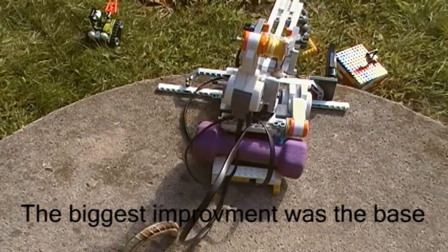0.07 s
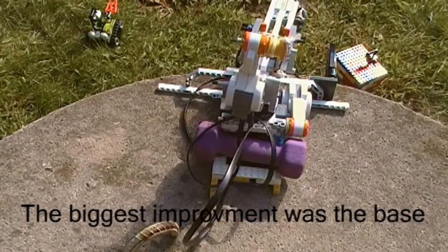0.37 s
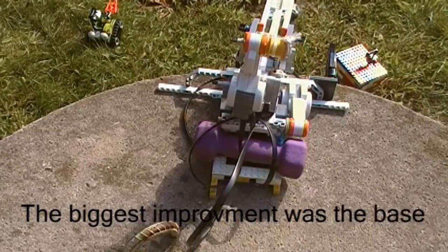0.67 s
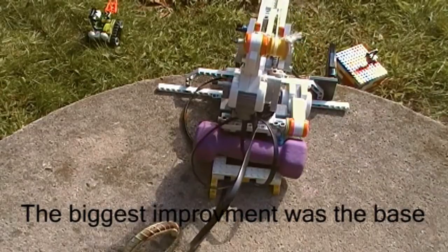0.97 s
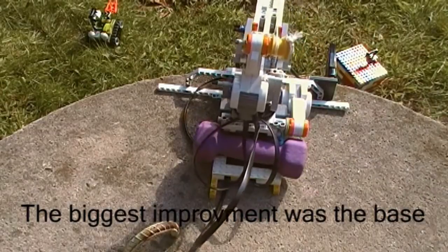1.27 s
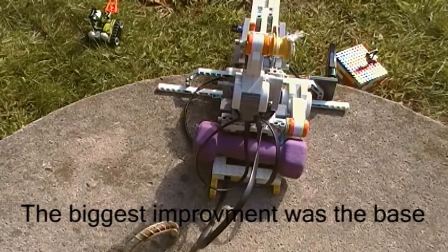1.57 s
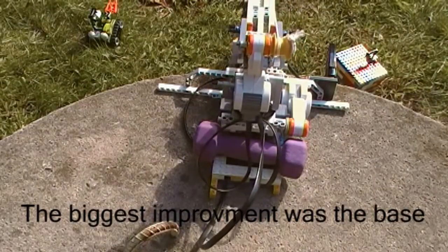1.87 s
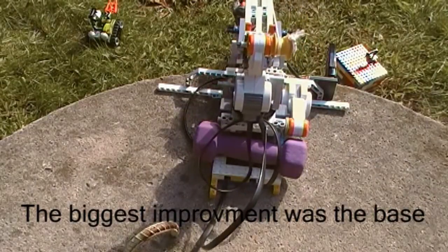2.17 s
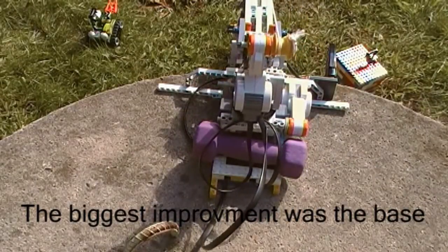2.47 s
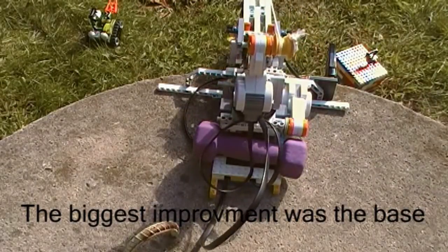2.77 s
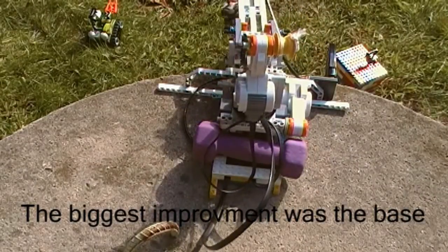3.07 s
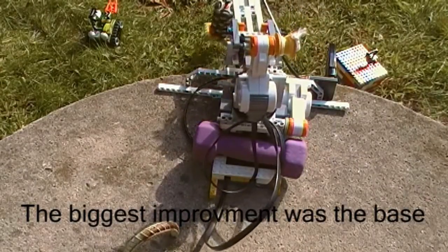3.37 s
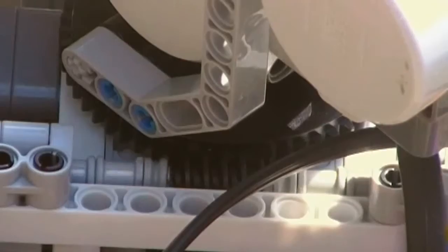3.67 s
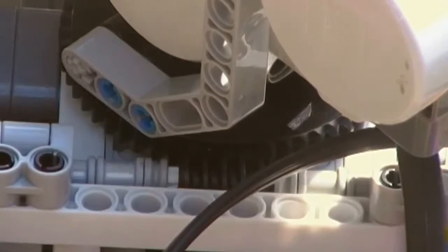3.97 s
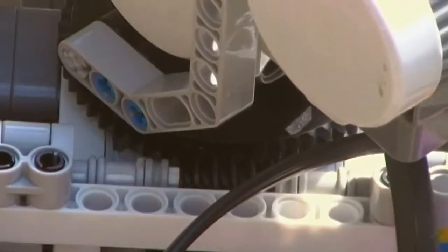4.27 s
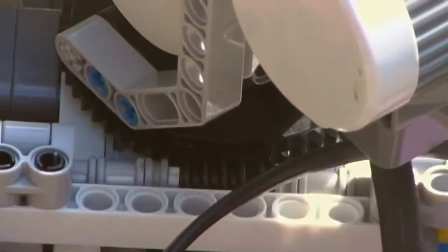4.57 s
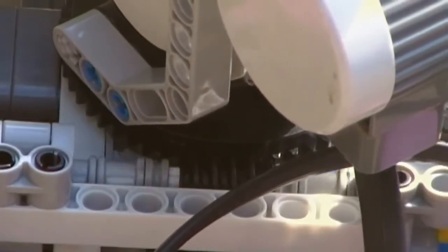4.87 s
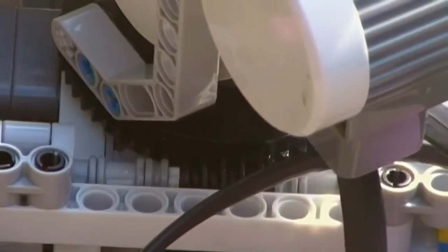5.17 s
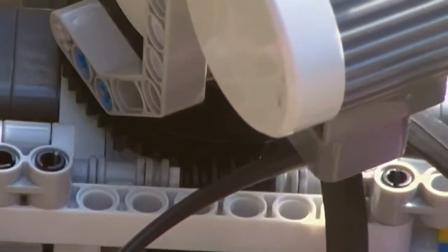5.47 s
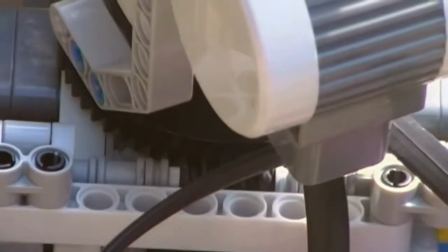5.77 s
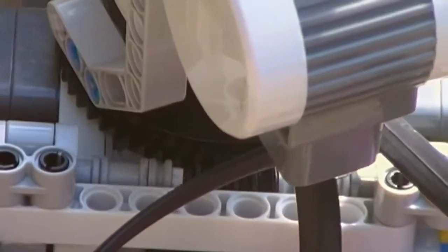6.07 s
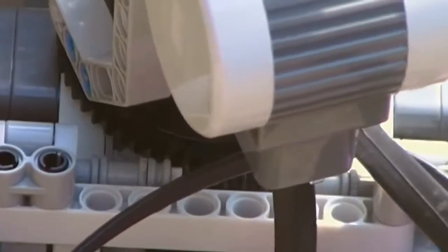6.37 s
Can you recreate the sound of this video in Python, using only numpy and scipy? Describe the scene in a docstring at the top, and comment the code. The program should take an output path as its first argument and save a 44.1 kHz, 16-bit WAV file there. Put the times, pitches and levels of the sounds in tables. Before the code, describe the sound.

A small geared motor whines and throbs outdoors, stops, then a closer, faster, raspier one chatters on over a light breeze.

```python
"""A small geared servo whines and throbs: the hoist of a plastic model crane on a garden slab.
It sags under load and stops; the slewing drive then starts, closer, faster and raspier, and
squeals as the turntable binds. Off-centre gears make the mesh tones throb; pinion teeth strike
the gear trains and ring the plastic housings. Joints creak as the jib rises.
Behind it, a light breeze buffets the microphone over a low rumble and distant hums."""
import sys
import numpy as np
from scipy.fft import rfft, irfft, next_fast_len
from scipy.io import wavfile
from scipy.ndimage import map_coordinates

SR = 44100
rng = np.random.default_rng(int(sys.argv[2]) if len(sys.argv) > 2 else 0)


def int16_out(signal):
    """Quantize to a 16-bit WAV file."""
    q = np.round(np.clip(np.atleast_2d(signal).T, -1, 1) * 32767)
    wavfile.write(sys.argv[1], SR, q.astype(np.int16))


N = 283563
T = np.arange(N) / SR

PINION_TEETH, MARKS_PER_TURN, TOP_HZ = 10, 700, 13300
HOIST_STOP_S, SLEW_START_S = 3.626, 3.646
HOIST_CRUISE_RPS, SLEW_CRUISE_RPS = 49.356, 82.984  # shaft turns per second
SPIN_UP_RPS, SPIN_UP_TAU_S, BED_IN_TAU_S = 42.855, .059, .31
BIND_AT_S, BIND_RISE_S, BIND_DRAG_RPS = 6.085, .209, 4.113
UPPER_DB_PER_RPS, RATTLE_DB_PER_RPS, TREBLE_DB_PER_RPS = .6, .37, .23  # slower hoist: softer, duller
BREEZE_DB, LULL_AT_S, LULL_DB_PER_S = -32.5, 2.94, 3
RUMBLE_DB, RUMBLE_FADE_DB_PER_S = -35.5, .56
# Each triple: running level, change at start, change while binding.
SLEW_WHINE_DB, SLEW_RATTLE_DB, SLEW_TREBLE_DB = (-34.5, -6.5, -2.5), (-21.5, -4, 0), (-3, -3.5, 1)
# Off-centre gears, in cycles per shaft turn.
HOIST_RATIOS, SLEW_RATIOS = (1 / 4, 5 / 3, 1, 4 / 3, 2), (1 / 4, 1 / 3, 1, 2)
WINCH_RATIOS = (1 / 12, 1 / 4, 1 / 3)

# Runout of those gears, in the same order. Each row: swing in dB, tight spot in cycles.
HOIST_RUNOUT_DB = [(0.58, 0.04), (0, 0.74), (3, 0.092), (0.82, 0.28), (0.53, 0.66)]
SLEW_RUNOUT_DB = [(0.53, 0.84), (0.15, 0.13), (2.08, 0.84), (0.9, 0.19)]
WINCH_RUNOUT_DB = [(0.47, 0.54), (1.1, 0.37), (0.36, 0.7)]
# Mesh overtones. Each row: multiple of shaft speed, relative level in dB.
HOIST_OVERTONES_DB = [(10, -38), (19, -20), (29, -18), (31, -15.5), (40, 0), (49, -19), (71, -16),
                      (80, -6.5), (91, -8), (99, -7)]
SLEW_OVERTONES_DB = [(9, -20), (20, 0.5), (29, 6.5), (30, 2.5), (36, 2), (39, -0.5), (44, 1), (49, -7),
                     (50, 5.5), (60, 7.5)]
SQUEAL_OVERTONES_DB = [(30, -24), (50, -20)]
# The load eases or catches. Each row: centre and half length in seconds, extra turns per second.
HOIST_SURGES_RPS = [(.272, .171, 1.905), (.72, .442, 1.057), (1.277, .15, 2.228), (1.655, .223, 1.467),
                    (2.171, .189, 2.041), (2.55, .068, -1.207)]
SLEW_SURGES_RPS = [(4.048, .189, 1.698), (4.71, .11, -.92), (5.296, .037, -1.086), (5.562, .178, .561),
                   (6.028, .062, 1.171)]
# The winch takes the weight, then comes free. Each row: time in seconds, turns per second lost.
HOIST_DRAG_RPS = [(2.482, 0), (2.955, 9.3), (3.11, 1.7), (3.313, 1.16), (3.664, -1.78)]
# Hoist mix. Each row: time in seconds, then gains in dB for lower whine, upper whine, rattle, its treble.
HOIST_MIX_DB = [(0, -23, -31.5, -31, -6.5), (1.45, -26.5, -30, -32, -6.5), (2.4, -25.5, -28.5, -31, -8),
                (3.6, -29, -38, -29, -9.5)]
# Lower whine under load. Each row: centre and half length in seconds, change in dB.
HOIST_STRAIN_DB = [(2.57, .055, -5), (2.75, .07, .5), (2.845, .015, -6), (2.94, .04, -6), (3.01, .03, 2.5),
                   (3.09, .035, -4.5), (3.27, .1, 2), (3.42, .05, -5), (3.57, .08, -2)]
# Once-a-turn chirrup. Each row: time in seconds, level in dB.
CHIRRUP_DB = [(0, -33), (.22, -38), (.5, -33), (.95, -36), (1.42, -31.5), (1.95, -37), (2.3, -33),
              (2.5, -40), (2.7, -32.5), (2.85, -50)]
# Winch groans. Each row: centre and half length in seconds, multiple of shaft speed, level in dB.
GROANS_DB = [(2.65, .07, 51, -37), (2.89, .09, 29, -38), (2.94, .07, 60, -34), (2.95, .06, 50, -36),
             (3.25, .2, 50, -35), (3.3, .25, 35, -38)]
# Hum of bedded-in teeth. Each row: multiple of shaft speed, level in dB, change while binding in dB.
SLEW_HUMS_DB = [(10, -32.5, 1), (13, -45, 5)]
# Broad housing colour. Each row: frequency in Hz, gain in dB.
HOIST_SHELL_DB = [(200, -42), (400, -6), (750, -17), (1100, -12.5), (1700, -3), (2600, -7.5), (3750, -8.5),
                  (4050, -2), (5200, 0), (5650, -9), (6800, -0.5), (9700, -8), (11500, -7.5),
                  (13000, -28.5)]
SLEW_SHELL_DB = [(300, -111), (520, -34.5), (740, -10.5), (1400, -10.5), (1700, -2), (2800, -3),
                 (3500, -1.5), (5200, -8), (6000, -8.5), (9250, -9.5), (9550, 0), (10250, 1), (10550, -8.5),
                 (13000, -16)]
# Housing peaks and notches. Each row: centre in Hz, width in Hz, gain in dB.
HOIST_MODES_DB = [(1600, 40, 0.5), (2440, 116, 4), (3020, 36, 5), (4740, 160, -0.5), (6260, 92, -23),
                  (7380, 700, -11.5), (8960, 190, 10), (9630, 250, 8.5)]
SLEW_MODES_DB = [(1640, 110, 1.5), (2054, 51, -6.5), (2420, 110, 7.5), (2876, 130, -8), (4118, 210, 10),
                 (4704, 150, -8.5), (4867, 610, 8.5), (7580, 450, -6), (8360, 110, 7.5)]
# Drive position. Each row: frequency in Hz, left minus right in dB.
HOIST_PAN_DB = [(600, 0.5), (1200, 0.5), (2200, 2), (4000, 0.5), (7400, -1.5), (13000, -3)]
SLEW_PAN_DB = [(600, -1), (1200, -0.3), (2200, 2), (4000, -1), (7400, 0.3), (13000, -0.7)]
# Drive width. Each row: frequency in Hz, side against mid in dB.
HOIST_WIDTH_DB = [(600, -10), (2000, -14), (4000, -11.5), (7400, -1), (9500, -2.5), (13000, -9)]
SLEW_WIDTH_DB = [(600, -21), (2200, -9.5), (4000, -12), (7400, -2.5), (10000, -9), (13000, -18)]
# Shifting joints. Each row: centre in seconds, level in dB, band centre in Hz.
JOINT_CREAKS = [(.9, -42, 520), (1.338, -31, 2750), (2.348, -32, 1200)]
# Gusts. Each row: centre and half length in seconds, rise over the breeze in dB.
GUSTS_DB = [(.35, 0.31, 2), (1.7, 0.41, 7), (3.87, 0.048, 12), (4.3, 0.085, 4), (4.6, 0.046, 9.5),
            (5.94, 0.054, 11)]
# Background spectra. Each row: frequency in Hz, relative level in dB.
BUFFET_SPECTRUM_DB = [(8, -5.5), (22, -1.5), (35, 0.5), (60, -21), (120, -34), (300, -86)]
RUMBLE_SPECTRUM_DB = [(25, -31), (60, 3.5), (115, -1), (160, -4.5), (230, -9), (310, -18.5), (420, -41.5),
                      (1000, -13.5), (4000, -74)]
# Distant hums. Each row: centre and half length in seconds, pitch in Hz, level in dB.
DISTANT_HUMS = [(0.398, 0.2, 80.6, -31.5), (4.71, 0.14, 118.3, -31), (5.13, 0.15, 115.3, -35)]


def hoist():
    """Loaded winch motor: throbs once per shaft turn, goes dull and rough as it slows."""
    drag_rps, = curves(HOIST_DRAG_RPS)
    excess_rps = swells(HOIST_SURGES_RPS) - drag_rps
    turns, load = gear_train(HOIST_CRUISE_RPS + excess_rps, HOIST_RATIOS, HOIST_RUNOUT_DB, uneven_db=.5)
    lower_db, upper_db, rattle_db, bright_db = curves(HOIST_MIX_DB)
    mesh = winch_whine(turns, load, drag_rps)
    lower = lowpass(mesh, 2400)
    tone = amp(lower_db + swells(HOIST_STRAIN_DB)) * lower
    tone += amp(upper_db + UPPER_DB_PER_RPS * excess_rps) * (mesh - lower)
    tone += winch_side_tones(turns, load, drag_rps)
    blows = tooth_blows(turns, load ** .85, scatter_teeth=.05, scatter_db=2, rub=1.7, grip=.5,
                        wear_turns=1, wear_share=.35)
    ring = housing(dispersed(blows, spread_s=.0016), HOIST_SHELL_DB, HOIST_MODES_DB,
                   body_db=1.5, treble_db=1.5 + bright_db + TREBLE_DB_PER_RPS * excess_rps)
    rattle = amp(rattle_db + RATTLE_DB_PER_RPS * excess_rps) * ring
    powered = gate(-1, HOIST_STOP_S, ramp_s=.008)
    coasting = .41 * gate(-1, HOIST_STOP_S + .05, ramp_s=.03)
    sound = tone * powered + rattle * np.maximum(powered, coasting) + creaks(half_s=.021)
    return placed(sound, HOIST_PAN_DB, HOIST_WIDTH_DB)


def winch_whine(turns, load, drag_rps):
    """Slow winch gears flutter the whine; it dips once per turn of the slowest."""
    mesh = whine(turns, load, HOIST_OVERTONES_DB, sway_teeth=.027, spot_turns=.16,
                 play_teeth=.02 + .002 * np.maximum(drag_rps, 0), flutter_db=1.5, slack=.5)
    dip_db = -7 * np.exp(12 * (np.cos(2 * np.pi * (WINCH_RATIOS[0] * turns - .56)) - 1))
    mesh *= amp(runout_db(turns, WINCH_RATIOS, WINCH_RUNOUT_DB) + dip_db)
    return filtered(mesh, lambda hz: amp(modes_db(HOIST_MODES_DB, hz)), causal=True)


def winch_side_tones(turns, load, drag_rps):
    """A chirrup at the tight spot; under load, groans and a growing hum an octave below the whine."""
    chirrup = amp(curves(CHIRRUP_DB)[0]) * whine(
        turns, load, [(60, 0)], sway_teeth=.026, spot_turns=.14, play_teeth=.007, flutter_db=1.2, slack=.7)
    groans = np.zeros(N)
    for at_s, half_s, multiple, db in GROANS_DB:
        groans += swells([(at_s, half_s, amp(db))]) * whine(
            turns, load, [(multiple, 0)], sway_teeth=.03, spot_turns=.1, play_teeth=.02,
            flutter_db=2, slack=.5)
    hum_db = -42.5 + .35 * drag_rps + 3.9 * wobble(28.02)
    return chirrup + groans + np.sqrt(load) * amp(hum_db) * tooth_harmonic(turns, 2)


def slew():
    """Turntable motor: jerks into motion with a chirp, chatters under light load, squeals as it binds."""
    age_s = np.maximum(T - SLEW_START_S, 0)
    bind = np.clip((T - BIND_AT_S) / BIND_RISE_S, 0, 1)
    speed_rps = SLEW_CRUISE_RPS - SPIN_UP_RPS * np.exp(-age_s / SPIN_UP_TAU_S)
    speed_rps += swells(SLEW_SURGES_RPS) - BIND_DRAG_RPS * bind
    turns, load = gear_train(speed_rps * (age_s > 0), SLEW_RATIOS, SLEW_RUNOUT_DB, uneven_db=.83)
    starting, binding = np.exp(-age_s / BED_IN_TAU_S), np.sqrt(bind)
    state = np.array([np.ones(N), starting, binding])
    whine_db, rattle_db, bright_db = np.array([SLEW_WHINE_DB, SLEW_RATTLE_DB, SLEW_TREBLE_DB]) @ state
    tone = amp(whine_db) * whine(turns, load, SLEW_OVERTONES_DB, sway_teeth=.037, spot_turns=.8,
                                 play_teeth=.022, flutter_db=4, slack=.54)
    squeal = swells([(6.22, .17, 1)]) * whine(turns, load, SQUEAL_OVERTONES_DB, sway_teeth=.03,
                                              spot_turns=.85, play_teeth=.018, flutter_db=2.5, slack=.6)
    hum = sum(amp(db + bind_db * binding + 1.2 * wobble(14)) * np.sin(2 * np.pi * multiple * turns)
              for multiple, db, bind_db in SLEW_HUMS_DB)
    chirp = swells([(3.688, .028, amp(-32))]) * (tooth_harmonic(turns, 2) + tooth_harmonic(turns, 3))
    blows = tooth_blows(turns, load, scatter_teeth=.23, scatter_db=2.6, rub=.9, grip=.3,
                        wear_turns=4, wear_share=.3)
    powered = gate(SLEW_START_S, 7, ramp_s=.01)
    ring = housing(dispersed(blows * powered, spread_s=.003), SLEW_SHELL_DB, SLEW_MODES_DB,
                   body_db=-1, treble_db=bright_db - 2)
    sound = (tone + (1 - starting) * hum + chirp) * powered + squeal + amp(rattle_db) * ring
    return placed(sound, SLEW_PAN_DB, SLEW_WIDTH_DB)


def gear_train(speed_rps, ratios, runout, uneven_db):
    """Wavering shaft angle in turns, and tooth load at rms 1."""
    waver_turns = .0045 * wobble(14) * (speed_rps > 0)
    turns = np.maximum.accumulate(np.cumsum(speed_rps) / SR + waver_turns)
    return turns, unit(amp(runout_db(turns, ratios, runout) + uneven_db * wobble(70)))


def runout_db(turns, ratios, runout):
    """Off-centre gears tighten and slacken the mesh."""
    return sum(swing_db * np.cos(2 * np.pi * (ratio * turns - spot))
               for ratio, (swing_db, spot) in zip(ratios, runout))


def whine(turns, load, overtones, sway_teeth, spot_turns, play_teeth, flutter_db, slack):
    """Mesh tone: the off-centre pinion sways its phase, backlash jitters it, slack teeth cut it off."""
    error_teeth = play_teeth * wobble(110) - sway_teeth * np.cos(2 * np.pi * (turns - spot_turns))
    angle_turns = turns + error_teeth / PINION_TEETH
    tone = np.zeros(N)
    for multiple, db in overtones:
        flutter = unit(amp(flutter_db * wobble(40)))
        tone += amp(db) * flutter * np.sin(2 * np.pi * (multiple * angle_turns + rng.random()))
    contact = np.tanh(2 * np.maximum(load - slack, 0))
    return unit(contact) * tone


def tooth_harmonic(turns, order):
    """One clean harmonic of the tooth rate."""
    return np.sin(2 * np.pi * order * PINION_TEETH * turns)


def tooth_blows(turns, load, scatter_teeth, scatter_db, rub, grip, wear_turns, wear_share):
    """One click per tooth, uneven in time and size, plus the scrape of sliding flanks."""
    teeth = PINION_TEETH * turns
    number = np.arange(1, int(teeth[-1]))
    timing, size = rng.standard_normal((len(number), 2)).T
    at_samples = np.interp(number + scatter_teeth * timing, teeth, np.arange(N)).astype(int)
    clicks = np.bincount(at_samples, amp(scatter_db * size), N)
    scrape = flanks(turns, wear_turns, wear_share) * np.exp(grip * np.cos(2 * np.pi * teeth))
    return load * (unit(clicks - clicks.mean()) + rub * unit(scrape))


def flanks(turns, wear_turns, wear_share):
    """Sliding noise: hiss, plus buzz from wear marks that return every wear_turns."""
    marks = rng.standard_normal(MARKS_PER_TURN * wear_turns)
    buzz = unit(map_coordinates(marks, [turns * MARKS_PER_TURN % len(marks)], mode="grid-wrap"))
    return np.sqrt(wear_share) * buzz + np.sqrt(1 - wear_share) * rng.standard_normal(N)


def dispersed(x, spread_s):
    """The frame smears each blow: arrival time varies with frequency."""
    delays_s = spread_s * (rng.random(64) - .5)
    lag_s = lambda hz: np.interp(hz, np.linspace(0, TOP_HZ, len(delays_s)), delays_s)
    return filtered(x, lambda hz: np.exp(-2j * np.pi * np.cumsum(lag_s(hz)) * hz[1]))


def housing(blows, shell, modes, body_db, treble_db):
    """The plastic shell rings with the blows; it is too small to radiate bass."""
    ring = filtered(blows, lambda hz: amp(along(shell, hz) + modes_db(modes, hz)), causal=True)
    ring = filtered(ring, lambda hz: hz ** 4 / (hz ** 4 + 450 ** 4))
    body = lowpass(ring, 5800)
    return amp(body_db) * unit(body) + amp(treble_db) * unit(ring - body)


def modes_db(modes, hz):
    """Housing resonances and notches as Gaussian bumps."""
    return sum(db * np.exp(-2 * ((hz - centre_hz) / width_hz) ** 2) for centre_hz, width_hz, db in modes)


def placed(x, pan, width):
    """Turning gears radiate in shifting directions, so left and right differ a little."""
    side = filtered(x * unit(np.sin(2 * wobble(60))), lambda hz: amp(along(width, hz)))
    return filtered(np.array([x + side, x - side]), lambda hz: amp(np.outer([.5, -.5], along(pan, hz))))


def creaks(half_s):
    """Plastic joints shift as the jib rises: short dry scrapes, each in its own band."""
    sound = np.zeros(N)
    for at_s, db, band_hz in JOINT_CREAKS:
        band = filtered(rng.standard_normal(N), lambda hz: 1 / (1 + 4 * np.log2((hz + 1) / band_hz) ** 4))
        sound += swells([(at_s, half_s, amp(db))]) * unit(band)
    return sound


def breeze():
    """A dying breeze gusts on the microphone ports, mostly the left."""
    level_db = BREEZE_DB - LULL_DB_PER_S * np.maximum(T - LULL_AT_S, 0) + swells(GUSTS_DB)
    common, left, right = coloured_noise(3, BUFFET_SPECTRUM_DB)
    return amp(level_db) * unit(np.array([left, right]) + .48 * common) * amp([[3.5], [-6]])


def rumble():
    """Low outdoor noise, slowly fading."""
    mid, side = coloured_noise(2, RUMBLE_SPECTRUM_DB)
    return amp(RUMBLE_DB - RUMBLE_FADE_DB_PER_S * T) * unit(mid + .26 * np.array([side, -side]))


def distant_hums():
    """Brief low tones with wavering phase."""
    return sum(swells([(at_s, half_s, amp(db))]) * np.sin(2 * np.pi * hz * T + .24 * wobble(6.2))
               for at_s, half_s, hz, db in DISTANT_HUMS)


def amp(db):
    """Decibels to gain."""
    return 10 ** (np.asarray(db) / 20)


def unit(x):
    """Scale to rms 1."""
    return x / np.sqrt(np.mean(x ** 2) + 1e-20)


def along(points, hz):
    """Read (Hz, dB) points on a log frequency axis."""
    points_hz, db = np.transpose(points)
    return np.interp(np.log(hz + 1), np.log(points_hz + 1), db)


def curves(rows):
    """Per-sample curve for each column after the time."""
    times_s, *columns = np.transpose(rows)
    return [np.interp(T, times_s, column) for column in columns]


def swells(rows):
    """Summed bumps. Each row: centre and half length in seconds, height."""
    return sum(height * np.exp(-((T - at_s) / half_s) ** 2) for at_s, half_s, height in rows)


def wobble(rate_hz):
    """Smooth random curve, rate_hz knots per second."""
    return map_coordinates(rng.standard_normal(int(N * rate_hz / SR) + 4), [T * rate_hz])


def gate(start_s, stop_s, ramp_s):
    """On/off envelope with linear ramps."""
    return np.clip((T - start_s) / ramp_s, 0, 1) * np.clip((stop_s - T) / ramp_s, 0, 1)


def filtered(x, gain, causal=False):
    """Apply gain(hz); causal uses minimum phase, so ringing follows each blow."""
    size = 2 * next_fast_len(N // 2 + 8192)
    response = gain(np.fft.rfftfreq(size, 1 / SR))
    if causal:
        cepstrum = irfft(np.log(np.maximum(response, 1e-6)))
        response = np.exp(rfft(np.r_[cepstrum[0], 2 * cepstrum[1:size // 2]], size))
    return irfft(rfft(x, size) * response, size)[..., :N]


def lowpass(x, cutoff_hz, order=24):
    """Steep zero-phase low-pass."""
    return filtered(x, lambda hz: 1 / (1 + (hz / cutoff_hz) ** order))


def coloured_noise(count, spectrum):
    """Independent noises with one spectrum."""
    return filtered(rng.standard_normal((count, N)), lambda hz: amp(along(spectrum, hz)))


def scene():
    """Both drives in the open air."""
    return hoist() + slew() + breeze() + rumble() + distant_hums()


def record(dry):
    """Soft-clip the highest peaks, then band-limit."""
    rounded = dry / (1 + (dry / .75) ** 6) ** (1 / 6)
    return lowpass(rounded, TOP_HZ, order=100)


dry = scene()
out = record(dry)
int16_out(out)
```